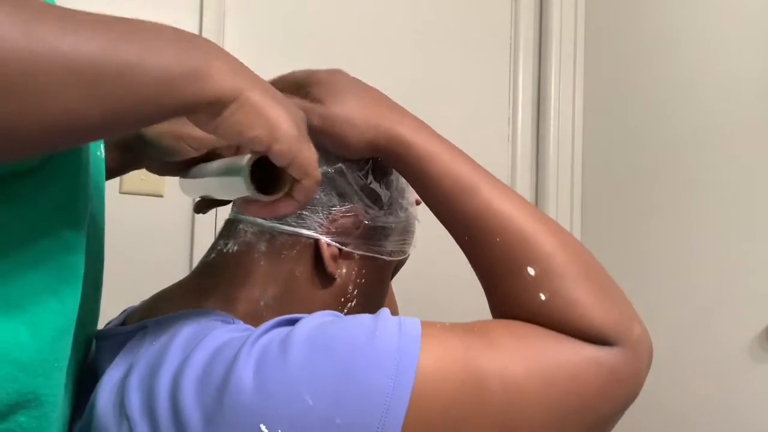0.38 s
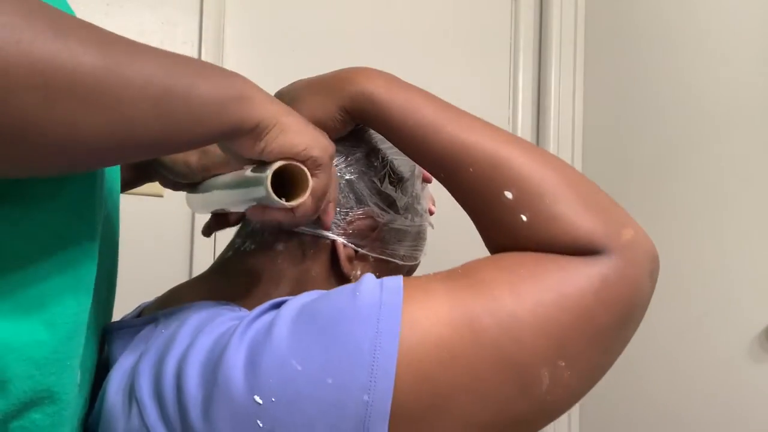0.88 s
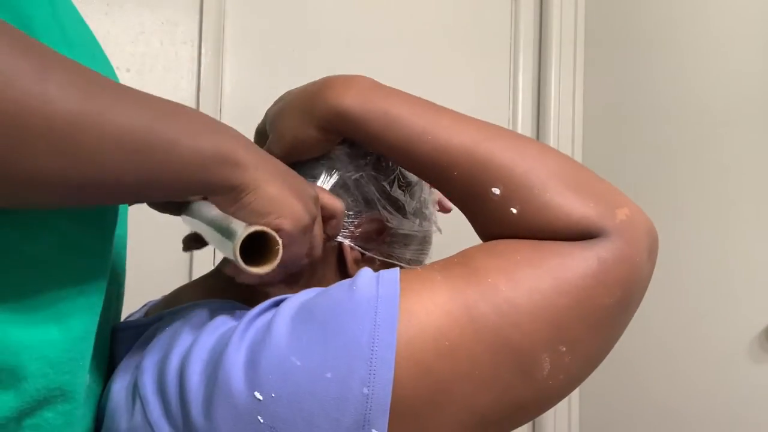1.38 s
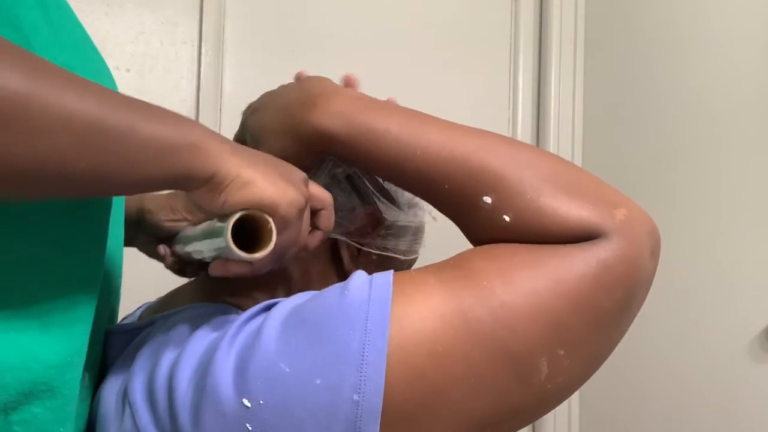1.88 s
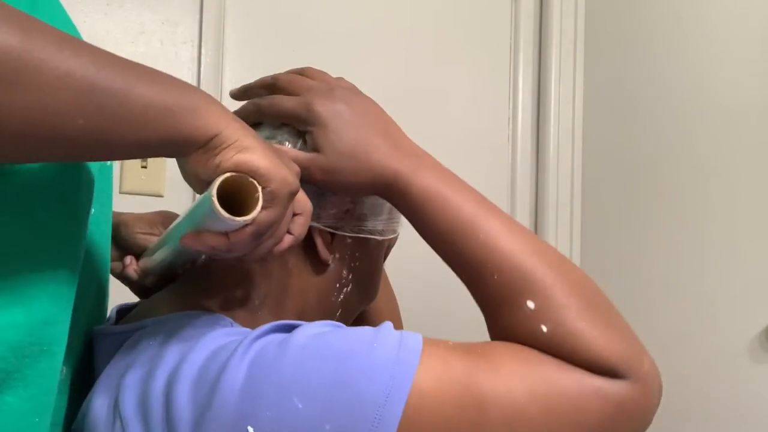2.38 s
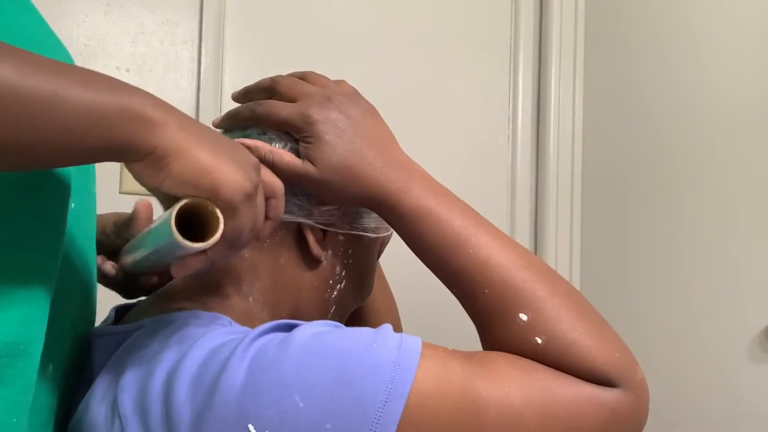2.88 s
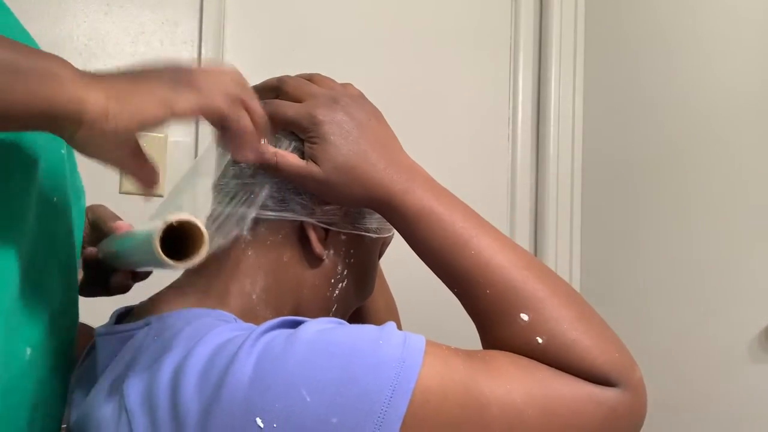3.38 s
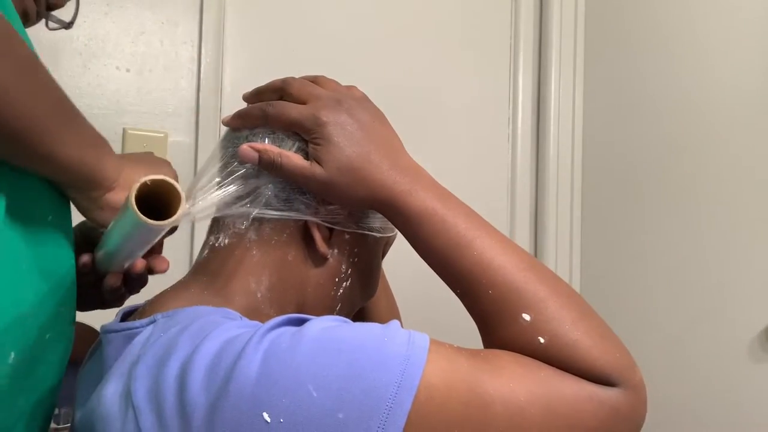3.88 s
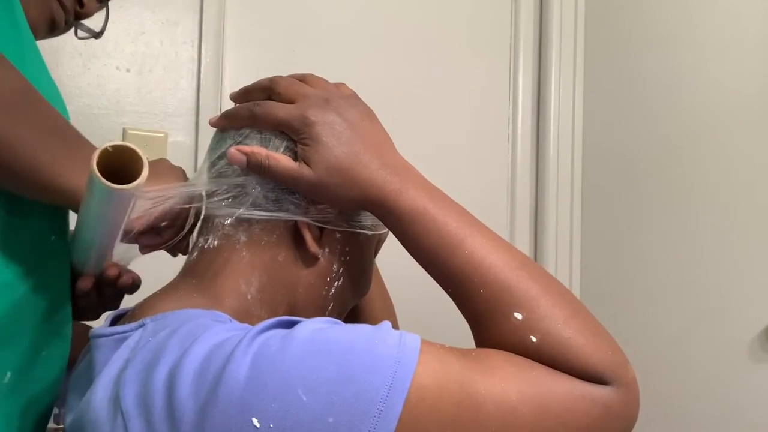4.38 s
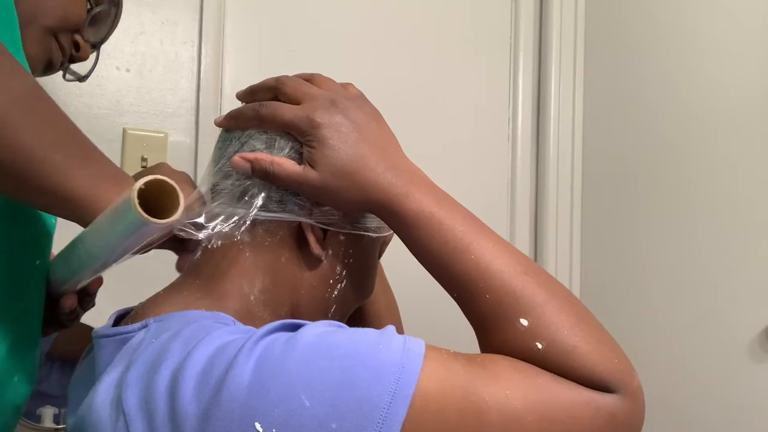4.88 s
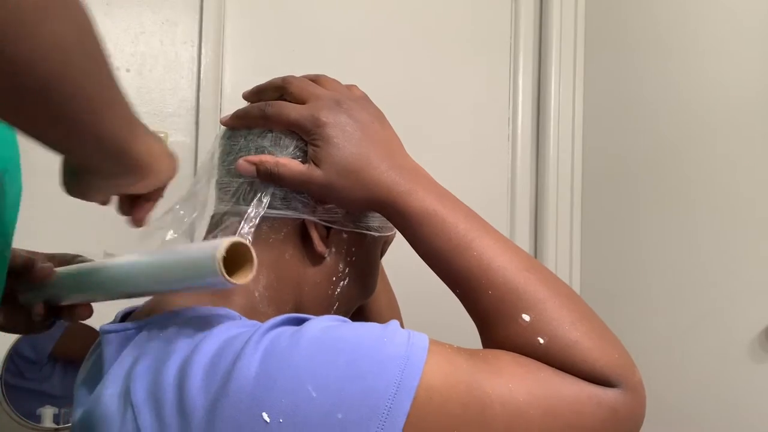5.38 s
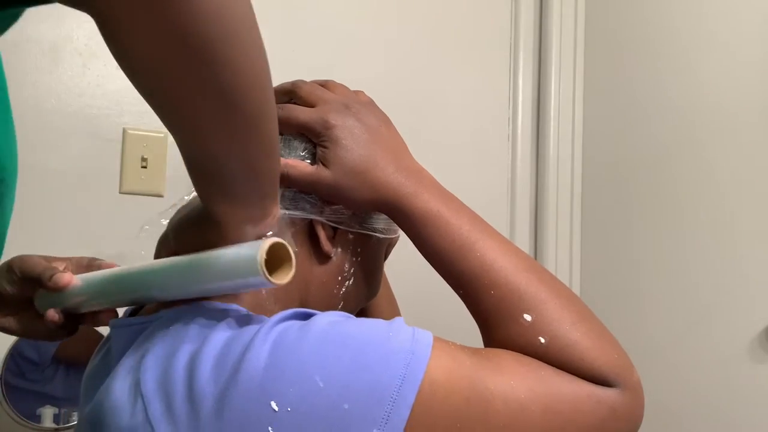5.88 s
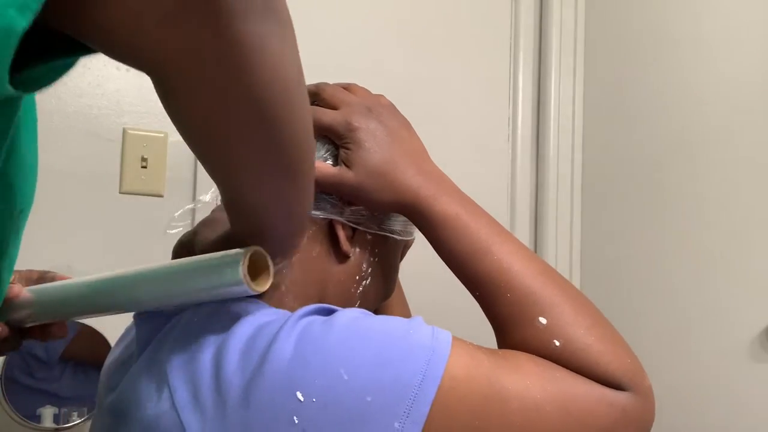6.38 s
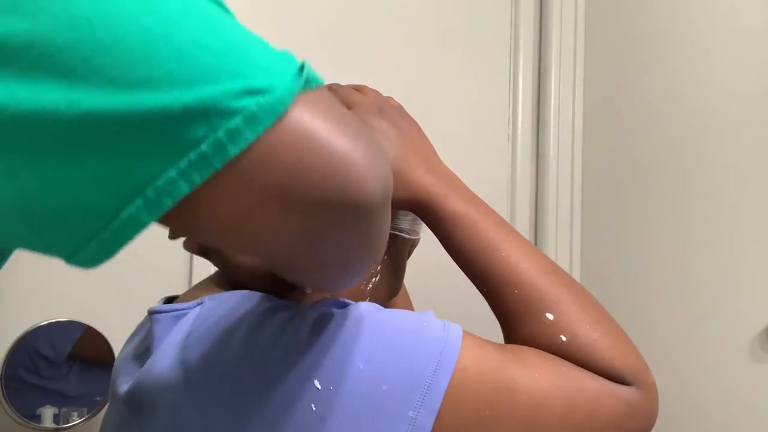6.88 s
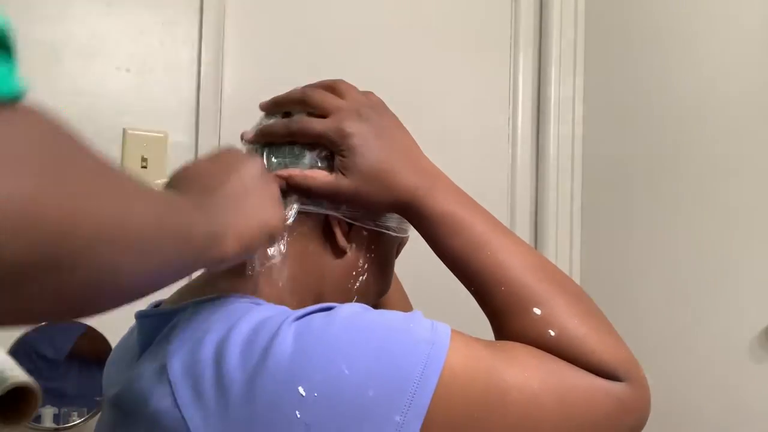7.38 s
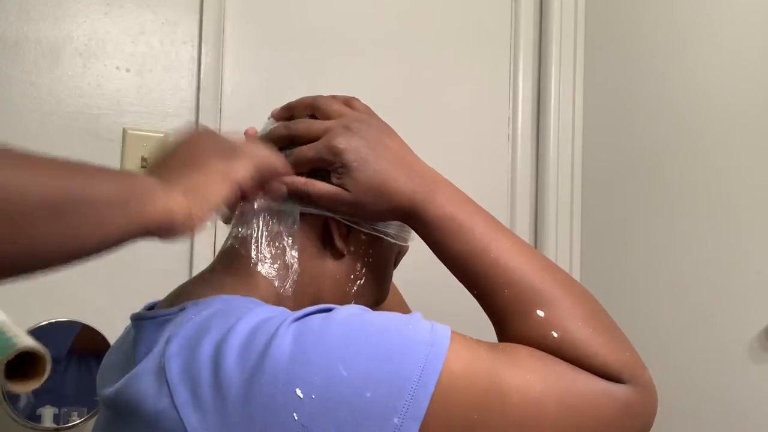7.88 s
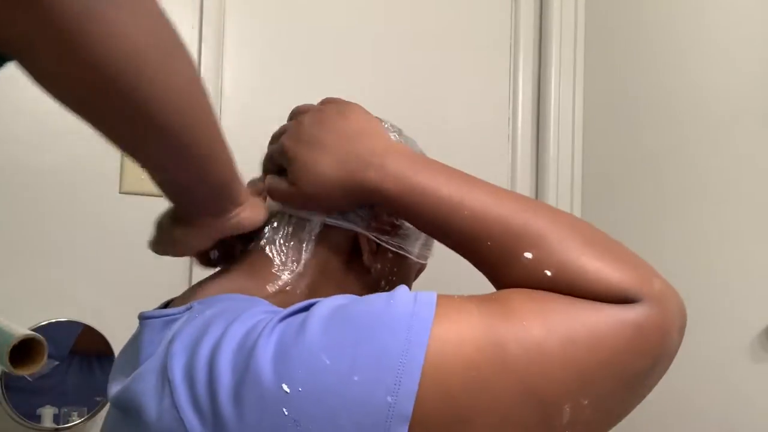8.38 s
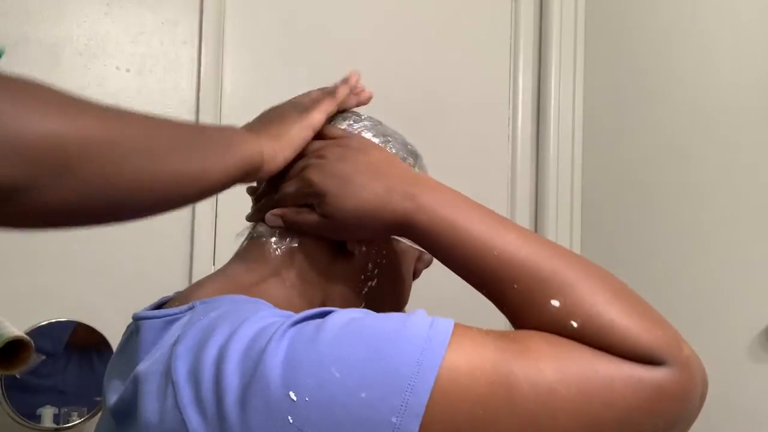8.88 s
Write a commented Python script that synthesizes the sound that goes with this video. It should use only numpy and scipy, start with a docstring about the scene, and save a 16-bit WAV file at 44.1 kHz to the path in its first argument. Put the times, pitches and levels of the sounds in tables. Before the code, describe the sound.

Cling wrap is stretched and pinched around a wrapped head, heard near a handheld microphone indoors. Busy, irregular crackle and crisp snaps run through the first half, some with a low papery flap, reaching one hard crack. Handling then thins into light crinkles and isolated ticks, followed by a few soft tube knocks and a gentle hand stroke, over quiet wavering house rumble and steady hiss.

```python
"""Dense crackles and a low flap open the scene: thin plastic film is pulled, torn and patted in a small hard room.
Creases of four sizes are random impulses through resonators; folds snap in decaying noise bursts.
A gliding two-partial tone squeaks, a struck roll rings in damped modes, and a palm swishes as coloured noise.
Noisy tails and bass modes form the room; wavering house rumble and steady hiss lie beneath."""
import sys
import numpy as np
from scipy import signal
from scipy.fft import rfft, irfft
from scipy.io import wavfile
from scipy.ndimage import uniform_filter1d

SR = 44100
rng = np.random.default_rng(int(sys.argv[2]) if len(sys.argv) > 2 else 0)


def elevation(decibels):
    """Turn decibel levels (scalar or array-like) into linear amplitude ratios."""
    levels = np.asarray(decibels, float)
    return 10 ** (levels / 20)


def generate_wav(signal):
    """Clip the signal to [-1, 1] and save it as 16-bit WAV at the path in sys.argv[1]."""
    frames = np.transpose(np.atleast_2d(signal))
    scaled = np.clip(frames, -1, 1) * 32767
    pcm = np.round(scaled).astype(np.int16)
    wavfile.write(sys.argv[1], SR, pcm)


N = 407925  # length in samples

# Rustles, one per pull, pinch or pat; coarseness is wide folds re fine creases, times are per 6 dB, at least 2 ms:
# peak_s, rise_ms, fall_ms, level_db (relative), coarseness_db
RUSTLES = [(0.038, 114, 14, -45, -3.5), (0.256, 38, 74, -40, -7.5), (0.478, 42, 69, -43, -15),
           (0.621, 91, 22, -38.5, -4.5), (0.724, 25, 30, -39.5, -30), (0.82, 7, 10, -36.5, -1),
           (0.943, 10, 52, -44.5, -9.5), (1.047, 3, 21, -38, -4.5), (1.133, 51, 19, -36, -11),
           (1.28, 107, 63, -45, -7), (1.358, 10, 51, -39.5, -3.5), (1.395, 0, 67, -41, -1),
           (1.515, 188, 11, -71, -25), (1.739, 80, 191, -57, -8), (1.85, 15, 15, -47.5, 3.5),
           (1.889, 0, 9.5, -35, 5.5), (1.95, 1, 14, -39, -8), (2.041, 7, 72, -42.5, -3.5),
           (2.171, 153, 11, -54, 1), (2.317, 17, 16, -49, -1), (2.465, 18, 10, -41.5, -6),
           (2.527, 66, 14, -39.5, -3.5), (2.628, 33, -2, -34.5, 2.5), (2.685, 5.5, 12, -34, -1),
           (2.846, 8, 26, -40, -12.5), (2.925, 6.5, 8.5, -35, 3.5), (3.236, 42.5, 21, -40.5, -5.5),
           (3.403, 83, 55, -50, -7.5), (3.624, 29, 44, -51.5, 0.5), (3.887, -3, -6, -53, -7),
           (4.051, 3, 0, -42, -33), (4.127, 5.5, 12.5, -28, -1), (4.342, 3, 6, -46, -8),
           (4.561, 18, 72, -53, -12.5), (4.679, 7, 10, -24, -3), (4.786, 18, 22, -41, -4.5),
           (4.856, 7, 5.5, -40.5, -15), (4.957, 10, 8, -49, -13), (5.092, 10, 52, -39.5, -6),
           (5.17, 42, 32, -46, -17), (5.396, 3, 10, -49.5, -7.5), (5.632, 28.5, 39, -47.5, -2.5),
           (5.751, 0, 63, -56.5, -0.5), (5.848, 4.5, 88, -42.5, -6), (6.006, 18, 30, -54, 3.5),
           (6.059, 9, 26, -43.5, -6), (6.143, 38, 51, -52, -4), (6.292, 34, 32, -48, 1),
           (6.409, 23, 29, -47, -7), (6.544, 24, 11, -51.5, -11), (6.648, 7.5, 6, -33, -15),
           (6.722, 40, 45, -56, -0.5), (6.848, 2, 56, -53, -7.5), (6.942, 15, 54, -42.5, -8.5),
           (7.178, 54, 25, -53.5, -10.5), (7.394, 23.5, 38, -47, -6.5), (7.515, 35, 30, -53, -10),
           (7.688, 41, 28, -48.5, -12), (7.922, 39, 13, -43, -19.5), (7.966, 23, 18, -45.5, -13),
           (8.08, 60, -3, -50, -15), (8.176, 58, 13, -46.5, -6.5), (8.343, 40, 27, -42.5, -13),
           (8.8, 31, 30, -64, 1.5), (9.228, 23, 0, -46, -38)]
# Hands resting and sliding on the film between rustles: time_s, level_db (relative), coarseness_db
SLIDING = [(0.0, -52.5, -12), (0.62, -50.5, -7), (1.6, -54.5, -9), (1.98, -43.5, -5), (2.26, -60, -21),
           (2.68, -52.5, -7), (3.05, -58.5, -12), (3.37, -67, -25), (3.84, -69, -20), (4.04, -54.5, -11),
           (4.17, -45, -7.5), (4.48, -65.5, -10), (4.95, -56.5, -1.5), (5.28, -60, -25), (5.5, -63, -30),
           (6.1, -82, -3), (6.6, -55, -30), (6.95, -58.5, -16), (7.25, -61.5, -5), (7.8, -55.5, -19.5),
           (8.3, -60.5, -14), (8.46, -56, -27), (8.6, -61, -22), (9.25, -51, -17)]
# Crease sizes, finest first; the rate is nominal:
# lowest_hz, highest_hz, buckles_per_s, trim_db, snap_trim_db, snap_decay_s
CREASES = [(6700, 13400, 2800, -6, 2, 0.00063), (1700, 5830, 1600, -6, -2.5, 0.00086),
           (510, 1740, 900, -5, 0, 0.0093), (66.5, 375, 630, -6.5, -3.5, 0.015)]
# Flaps of the taut sheet, times as for rustles: peak_s, rise_ms, fall_ms, level_db (relative), pitch_hz
FLAPS = [(0.03, 61, 39, -48.5, 140), (0.263, 62, 36, -47, 182), (0.606, 83, 18, -52, 175),
         (0.826, 3, 12, -46.5, 210), (1.087, 36, 14, -45.5, 183), (1.149, 19, 11, -43, 172),
         (1.383, 30, 0, -36.5, 138), (1.435, 17, 24, -35.5, 153), (1.898, 7, 11, -21, 169),
         (2.084, 41, 60, -42, 138), (2.553, 53, -2, -41.5, 170), (2.628, 19, 20, -27.5, 154),
         (2.694, 4, 12.5, -23.5, 115), (2.929, 6.5, 23, -30.5, 130), (3.607, 12, 88, -46.5, 210),
         (4.01, 197, 45, -60.5, 165), (4.128, 1, 23, -55, 176), (4.264, 49, 12, -50, 165),
         (4.685, -0.5, 3.5, -21.5, 235), (4.792, 0, 39, -45, 165), (5.091, 3, 32, -42, 170),
         (5.946, 182, 22, -57.5, 181), (6.115, 40, 45.5, -58, 148), (6.299, 32, 25, -50.5, 140),
         (6.736, 45, 25, -48, 145), (6.98, 26, 9, -50, 139.5), (7.408, 24, 28, -52.5, 117),
         (8.09, 31, 22, -54, 130), (8.8, 54, 87, -61, 195)]
# House background, wavering rumble and steady hiss, spectral weights: frequency_hz, weight_db
HOUSE_COLOUR = [(22, -50), (38, 3), (176, -1.5), (394, -19), (700, -20), (1200, -9), (1830, -13.5),
                (6270, -9), (7290, -23), (8480, -12), (13300, -11.5), (15500, -25.5)]
# Single folds letting go; fine and wide parts are re the middling part, all before trim:
# start_s, level_db, fine_part_db, wide_part_db, fold_pitch_hz
SNAPS = [(0.0277, -38, -7, -11, 2620), (0.2184, -22.5, -5.5, -35, 2170), (0.261, -23, -10, -30, 4690),
         (0.351, -32, -9, -27, 3000), (0.4105, -33, -8, -22, 2500), (0.427, -29.5, -16, -17.5, 2200),
         (0.445, -39, -10, -20.5, 2800), (0.4689, -35, 0, -28, 2400), (0.5295, -24, -15, -14, 2860),
         (0.545, -22, -13, -20, 2800), (0.5875, -21.5, -20, -18.5, 2750), (0.601, -21.5, -15, -12, 2800),
         (0.612, -26.5, -17, -11, 1800), (0.631, -26, -9, -33, 5800), (0.65, -24.5, -7, -35, 2300),
         (0.7014, -32, -9, -19, 2280), (0.726, -35.5, 6, -16, 3500), (0.752, -32, 1, -31, 3500),
         (0.8128, -16.5, -26, -29, 1770), (0.94, -33, -6, -32, 2300), (0.9583, -30, -17, -33, 2800),
         (0.992, -33, -12, -21, 2300), (1.0468, -21.5, -9, -42, 2730), (1.3077, -35, 3, -31, 2120),
         (1.355, -27.5, -12, -28, 2770), (1.3593, -26, -13, -14, 1900), (1.385, -30, -12, -17, 2000),
         (1.486, -27, -12, -41, 4060), (1.5112, -30.5, -11, -33, 3000), (1.5782, -32, -6.5, -23, 3000),
         (1.733, -40, 7, -13, 2040), (1.8457, -14.5, -8, -22, 2290), (1.8844, -16.5, -3.5, -18, 2240),
         (1.9455, -16.5, -10.5, -32, 3040), (1.9803, -21, -11, -23, 2300), (2.1868, -20, -2.5, -17, 5700),
         (2.31, -38.5, 1, -11, 1890), (2.385, -29.5, -8.5, -40, 4540), (2.4414, -22.5, -10, -27, 4460),
         (2.5143, -42, -9, -14, 4800), (2.5703, -30, -6, -28, 3000), (2.58, -27, -2, -15, 2240),
         (2.598, -35, -6, -23, 2600), (2.616, -9, -6.5, -24, 3200), (2.618, -10.5, -7.5, -26, 2870),
         (2.623, -20.5, -10, -1, 1750), (2.634, -30, 1, -30, 2050), (2.68, -26, 0, -26, 1850),
         (2.685, -17.5, -7, -23.5, 3320), (2.82, -40, 9, -13, 2210), (2.835, -25, 0.5, -29, 5070),
         (2.9187, -11.5, -12.5, -24, 1740), (3.134, -35, -4, -25, 1680), (3.2048, -42, 9, -18, 1620),
         (3.225, -37, 7, -27, 2250), (3.3883, -30.5, -1.5, -22.5, 1860), (3.555, -37, -3.5, -28, 5340),
         (3.6097, -39.5, -3, -4, 1970), (3.6527, -26.5, -4.5, -19, 2230), (3.7578, -39.5, -3.5, -39, 3430),
         (3.8841, -42, 0, -32, 2740), (3.929, -43, 0, -34, 2050), (4.0452, -34, -1, -32, 5780),
         (4.12, -20.5, 0, -31, 2340), (4.1236, -12, -11, -17, 2300), (4.3264, -35.5, 0, -31, 2260),
         (4.409, -49, -8, -7, 2070), (4.559, -33.5, -14, -41.5, 4950), (4.659, -44, 2, -20, 1800),
         (4.6687, -17.5, -7, -10, 4190), (4.6769, 0.5, -22.5, -17, 2050), (4.699, -20, -10.5, -13.5, 2100),
         (4.7828, -19.5, -13.5, -25, 2190), (4.8451, -28, -8, -18, 5970), (5.046, -44, -1, -17, 3000),
         (5.068, -35, -21, -28, 2820), (5.0908, -33, -9, -14.5, 1840), (5.116, -31.5, -9, -17, 2290),
         (5.145, -26, -8, -22, 5000), (5.152, -31, -10, -17.5, 3500), (5.1867, -27.5, -3, -45, 1890),
         (5.343, -46, 1, -30, 4000), (5.6134, -39, -2, -25, 2520), (5.6256, -37, 0, -34, 2500),
         (5.7577, -34, -2.5, -38, 1970), (5.851, -23.5, -11, -48, 3540), (5.867, -28, -10, -27, 2170),
         (5.882, -36, -5, -31, 2730), (6.0028, -45, -6, -9, 3140), (6.0521, -31, 5, -25, 3300),
         (6.1338, -42, 7, -25, 3000), (6.2467, -35.5, 0, -26, 3080), (6.377, -43.5, 8.5, -29, 4400),
         (6.4025, -40, 8, -17, 1740), (6.647, -17.5, -4, -31, 1550), (6.8554, -31.5, -5, -37, 3270),
         (6.892, -47, -9, -7, 1700), (6.9304, -44, -9, -8, 1700), (6.9437, -42, -8, -29, 3200),
         (7.517, -37.5, -3, -20, 5950), (8.075, -49.5, 14, -28, 5550), (8.1448, -35.5, -12, -17, 3090),
         (8.73, -40, -3, -33, 2300)]
# Stretch squeaks, one list each; octave is re the pitch: time_s, pitch_hz, level_db (relative), octave_db
SQUEAKS = [
    [(4.14, 301, -64, -15), (4.166, 312, -46, -20), (4.216, 303.7, -43, -24), (4.24, 288, -49, -10),
     (4.268, 271, -59, -10), (4.295, 276, -76, 4), (4.325, 283, -62, -11), (4.35, 282, -75, 0),
     (4.38, 276, -83, 1)],
    [(3.97, 1300, -74, -17), (3.99, 1270, -71, -20), (4.03, 1200, -75, -20)],
    [(4.13, 1250, -54, -20), (4.17, 1250, -52, -20), (4.205, 1300, -66, -20)],
]
# Soft blows on the cardboard roll: start_s, level_db (relative)
BUMPS = [(4.409, -36.5), (4.447, -43), (4.495, -45), (7.97, -32), (8.003, -33.5), (8.038, -41.5),
         (8.094, -45)]
# Modes of the roll: frequency_hz, level_db (relative), t60_s
ROLL_MODES = [(165, 7.5, 0.079), (217, 2, 0.16), (307, -4, 0.21), (453, -20, 0.12), (524, -19, 0.23),
              (660, -20, 0.23), (770, -16.5, 0.28), (903, -17.5, 0.12)]
# Strokes of a flat palm: time_s, level_db (relative)
PALM_STROKE = [(8.42, -86), (8.52, -59.5), (8.62, -56), (8.8, -57), (9.0, -54.5), (9.15, -58), (9.25, -63)]
# Colour of the palm's swish: frequency_hz, weight_db
PALM_COLOUR = [(300, -32), (700, -16), (1200, -6.5), (2500, 1), (5000, -3), (9000, -3.5), (15000, -7)]
# Diffuse tail by band, before levelling; likeness of left and right runs from -1 opposed to 1 same:
# frequency_hz, t60_s, level_db (relative), likeness
TAIL = [(130, 0.095, 0, 1), (288, 0.17, 8.5, -0.49), (907, 0.23, 6.5, -0.24), (2980, 0.19, 4, -0.03),
        (6100, 0.15, 9, -0.013), (11500, 0.092, -5.5, 0.32)]
# Bass modes of the room: frequency_hz, t60_s, level_db (relative)
ROOM_MODES = [(119, 0.31, 4.5), (165, 0.2, 3.5), (217.2, 0.16, -5.5), (260, 0.068, -4), (310, 0.24, -6.5),
              (570, 0.18, 0.5)]
# Overall colour of the handling sounds: dull bass, a narrow dip near 7.3 kHz, steep top cut: frequency_hz, gain_db
HANDLING_COLOUR = [(25, -49), (60, -7.5), (120, -11.5), (230, -5), (380, -6), (560, -2.5), (2000, -4),
                   (5000, -1), (6600, -2.5), (7300, -9), (8100, 0.5), (14900, 1), (15500, -39.5),
                   (17000, -36)]
# Difference between the two microphone ports: frequency_hz, left_minus_right_db
PORTS = [(60, -1), (110, 5.5), (200, 6), (380, -1.5), (700, 2.5), (1290, -0.5), (2380, -1), (4400, -0.5),
         (8120, 4), (15000, 1)]


def colour(x, points_db):
    """Linear filtering: weights the spectrum by (Hz, dB) points joined over log frequency."""
    hz, db = np.transpose(points_db)
    f = np.maximum(np.fft.rfftfreq(x.shape[-1], 1 / SR), 1)
    gain = elevation(np.interp(np.log(f), np.log(hz), db))
    return irfft(rfft(x) * gain, x.shape[-1])


def ring(x, hz, width):
    """Resonance: a two-pole response with gain 1 at its centre and a bandwidth in Hz."""
    return signal.lfilter(*signal.iirpeak(min(hz, 0.45 * SR), hz / width, SR), x)


def unit(x):
    """Normalization: scales to rms 1."""
    return x / np.sqrt(np.mean(x ** 2))


def walk(rate):
    """Random modulation: independent levels, rate per second, joined by linear glides; spread near 1."""
    hold = int(SR / rate)
    levels = np.repeat(rng.standard_normal(N // hold + 1), hold)
    return 1.2 * uniform_filter1d(levels, hold)[:N]


def damping(t, t60):
    """Exponential decay: amplitude falls by 60 dB in t60 seconds."""
    return np.exp(-np.log(1000) * t / t60)


def swells(s, rise_ms, fall_ms, db):
    """Addition of powers: each movement swells to a rounded peak and dies away."""
    step = 96  # samples between computed values
    roundness = 1.3  # dB below the peak grows as this power of time
    rise, fall = np.maximum(rise_ms, 2) / 1000, np.maximum(fall_ms, 2) / 1000
    late = np.arange(0, N + step, step) / SR - s[:, None]
    away = np.where(late < 0, -late / rise[:, None], late / fall[:, None]) ** roundness
    power = np.sum(elevation(db[:, None] - 6 * away) ** 2, axis=0)
    return np.interp(np.arange(N), np.arange(len(power)) * step, power)


def handling(base_db, slope):
    """Division of power: rustles add to sliding, coarseness weighting this crease size by slope dB per dB."""
    s, rise, fall, db, coarse = np.transpose(RUSTLES)
    slide_s, slide_db, slide_coarse = np.transpose(SLIDING)
    sliding_db = np.interp(np.arange(N) / SR, slide_s, slide_db + slope * slide_coarse)
    rustling = swells(s, rise, fall, db + slope * coarse)
    return elevation(base_db) ** 2 * (elevation(sliding_db) ** 2 + rustling)


def crackle(lo_hz, hi_hz, rate, odds, size, centre_hz=None):
    """Impulse excitation: random buckles ring resonators briefly, and the best-answering pitches keep changing."""
    run_s, even_s, patchy_db = 0.00015, 0.05, 2.5
    happens = odds < rate / SR
    # a buckle runs along its crease for a moment
    run = np.sqrt(signal.lfilter([1], [1, -np.exp(-1 / (run_s * SR))], happens * size ** 2))
    out = 0
    for hz in np.geomspace(lo_hz, hi_hz, 7):
        clicks = run * rng.standard_normal(N) * elevation(patchy_db * walk(22))
        clicks = ring(ring(clicks, hz, 0.33 * hz), hz, 1.53 * hz) / np.sqrt(hz)
        if centre_hz is not None:
            # the tension of the sheet picks the pitch it flaps at
            clicks = clicks * np.exp(-(np.log(hz / centre_hz) / 0.49) ** 2)
        out = out + clicks
    # the hand feeds the film a steady power, however it is shared out
    return out / np.sqrt(uniform_filter1d(out ** 2, size=int(even_s * SR)) + 1e-18)


def house():
    """Coherence: wavering rumble is shared by both ports, smooth hiss is independent in each."""
    shared, left, right = rng.standard_normal((3, N))
    rumble = ring(shared, 46, 250) * elevation(2.9 * walk(3.4))
    hiss = 0.8 * np.array([left, right])
    return elevation(-61) * unit(colour(hiss + rumble, HOUSE_COLOUR))


def snaps(lo_hz, hi_hz, db, decay_s, pitched):
    """Sudden release: a fold lets go in a decaying noise burst; a pitched part leans to the fold's resonance."""
    let_go = 1.2  # first jolt re the ragged rest
    s, fold_hz = np.array(SNAPS)[:, 0], np.array(SNAPS)[:, -1]
    t = np.arange(2048) / SR
    bursts = rng.standard_normal((len(s), len(t))) * np.exp(-t / decay_s)
    bursts[:, 0] += let_go * np.sqrt(decay_s * SR)
    edges = [max(lo_hz * 1.02, 147), min(hi_hz * 1.01, 0.45 * SR)]  # a thump reaches no lower than 147 Hz
    bursts = signal.sosfilt(signal.butter(2, edges, "band", fs=SR, output="sos"), bursts)
    out = np.zeros(N + len(t))
    for burst, start, hz, gain in zip(bursts, (s * SR).astype(int), fold_hz, elevation(db)):
        if pitched:
            burst = 0.35 * burst + ring(burst, hz, 0.3 * hz)
        # equal energy for a given decay, whatever the random draw
        level = np.sqrt(decay_s * SR / np.sum(burst ** 2) / 4)
        out[start:start + len(t)] += burst * gain * level
    return out[:N]


def squeak():
    """Stick-slip friction: the stretched sheet slips on itself in a slightly hoarse tone and its octave."""
    out, t = np.zeros(N), np.arange(N) / SR
    for s, hz, db, octave_db in map(np.transpose, SQUEAKS):
        pitch = np.interp(t, s, hz) * (1 + 0.0141 * walk(90))
        phase = 2 * np.pi * np.cumsum(pitch) / SR
        tone = np.sin(phase) + elevation(np.interp(t, s, octave_db)) * np.sin(2 * phase)
        level = elevation(np.interp(t, s, db, -140, -140))
        out += np.sqrt(2) * tone * elevation(2.5 * walk(60)) * level
    return out


def bumps():
    """Modal response: each soft blow pushes the roll, which rings in its own damped modes."""
    push_s = 0.0023
    t, blows = np.arange(SR // 2) / SR, np.zeros(N)
    for s, db in BUMPS:
        blows[int(s * SR)] = elevation(db)
    rings = sum(elevation(db) * np.sin(2 * np.pi * hz * t) * damping(t, t60) for hz, db, t60 in ROLL_MODES)
    soft_onset = 1 - np.exp(-t / push_s)
    return signal.fftconvolve(blows, rings * soft_onset / 2)[:N]


def palm():
    """Friction noise: a flat palm strokes the film in a smooth swish that barely flickers."""
    s, db = np.transpose(PALM_STROKE)
    swish = unit(colour(rng.standard_normal(N), PALM_COLOUR))
    return swish * elevation(np.interp(np.arange(N) / SR, s, db, -140) + 0.39 * walk(27))


def even(x):
    """Minimum-phase equalization: levels each channel's broad spectrum, so only fine ripple stays."""
    n = x.shape[-1]
    spectrum = rfft(x)
    total, k = np.cumsum(abs(spectrum) ** 2, axis=-1), np.arange(spectrum.shape[-1])
    reach = (k * 0.16).astype(int) + 15  # bins averaged to either side
    lo, hi = np.maximum(k - reach, 0), np.minimum(k + reach, k[-1])
    mean_power = (total[:, hi] - total[:, lo]) / (hi - lo)
    # the folded cepstrum keeps the filter causal
    cepstrum = irfft(-np.log(mean_power) / 2, n)
    fold = np.r_[1, np.full(k[-1] - 1, 2), 1, np.zeros(n - k[-1] - 1)]
    return irfft(spectrum * np.exp(rfft(cepstrum * fold)), n)


def room(lag):
    """Impulse response: direct sound, close reflections, a noisy tail per band and bass modes at both ports."""
    early_db, early_s = 14, 0.0005
    t = np.arange(SR // 2) / SR
    onset = np.clip(t / 0.0002, 0, 1)
    out = np.zeros((2, len(t)))
    out[0, lag] = out[1, 2] = elevation(3.5)  # direct sound, delays in samples
    for hz, t60, db, like in TAIL:
        noise = rng.standard_normal((3, len(t)))
        shared, left, right = 1.57 * ring(ring(noise, hz, 1.21 * hz), hz, 1.21 * hz)
        like = np.clip(like, -1, 1)
        common = np.sqrt(abs(like)) * shared * np.array([[1], [np.sign(like)]])
        separate = np.sqrt(1 - abs(like)) * np.array([left, right])
        # hands, arms and the phone's own edges crowd the first moments
        decay = damping(t, t60) * (1 + elevation(early_db) * np.exp(-t / early_s))
        level = elevation(db) * np.sqrt(2 * np.log(1000) / t60 / SR)
        out += level * (common + separate) * onset * decay
    out = elevation(6.5) * even(out)  # direct sound and tail together
    for hz, t60, db in ROOM_MODES:
        out += elevation(db - 47.5) * np.sin(2 * np.pi * hz * t) * damping(t, t60)
    return out


def film():
    """Shared excitation: one set of buckles drives every crease size, with snaps and the palm added."""
    s, rise, fall, flap_db, flap_hz = np.transpose(FLAPS)
    # order: fine, middling, wide, flapping; every movement also stirs the sheet a little
    powers = [handling(0, 0), handling(2.5, 0.46), handling(0, 1.395),
              handling(-11, 0.66) + swells(s, rise, fall, flap_db)]
    centres = [None, None, None, np.interp(np.arange(N) / SR, s, flap_hz)]
    _, snap_db, fine_db, wide_db, _ = np.transpose(SNAPS)
    snap_levels = [snap_db + fine_db, snap_db, snap_db + wide_db, snap_db + wide_db - 1]
    pitched = [False, True, False, False]
    # a buckle that moves a wide fold moves the finer creases on it too
    odds = rng.random(N) / elevation(4.0 * walk(70))
    size = elevation(np.minimum(4.6 * rng.exponential(size=N), 16))  # scatter and largest size in dB
    out = palm()
    for crease, power, level, centre, leans in zip(CREASES, powers, snap_levels, centres, pitched):
        lo, hi, rate, trim, snap_trim, decay_s = crease
        out = out + elevation(trim) * np.sqrt(power) * crackle(lo, hi, rate, odds, size, centre)
        out = out + snaps(lo, hi, level + snap_trim, decay_s, leans)
    return out


def in_room(source):
    """Convolution: hands move between places, each with its own echoes and path to the ports."""
    places, moves_per_s = 10, 16
    position = np.arange(N) / SR * moves_per_s + walk(14)
    heard = np.zeros((2, N))
    for k in range(places):
        distance = abs((position - k + places / 2) % places - places / 2)
        share = np.clip(1 - distance, 0, 1)  # power shared between neighbouring places
        here = source[None] * np.sqrt(share)
        heard += signal.fftconvolve(here, room(k % 3 + 1), axes=1)[:, :N]
    return heard


def scene():
    """Superposition: film in the room, squeaks and bumps are given the overall colour; the house is added."""
    handled = in_room(film()) + elevation(6.0) * squeak() + bumps()
    return colour(handled, HANDLING_COLOUR) + house()


def roll_off(x):
    """The treble ends steeply here."""
    return signal.sosfilt(signal.butter(12, 16480, fs=SR, output="sos"), x)


def record(dry):
    """Port response: the two ports differ in colour, half the difference applied to each."""
    hz, db = np.transpose(PORTS)
    left = colour(dry[0], np.transpose([hz, db / 2]))
    right = colour(dry[1], np.transpose([hz, -db / 2]))
    return roll_off(np.array([left, right]))


dry = scene()
out = record(dry)
generate_wav(out)
```